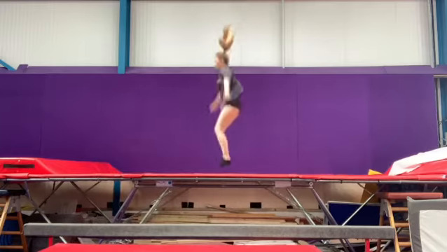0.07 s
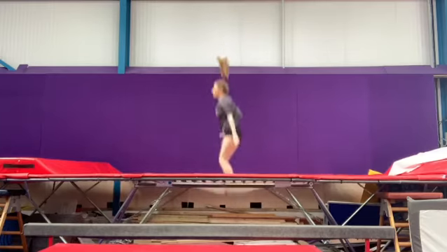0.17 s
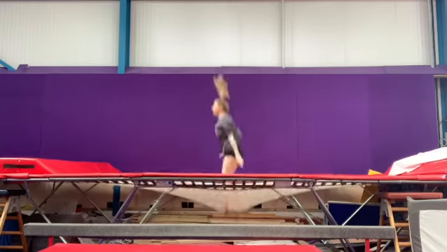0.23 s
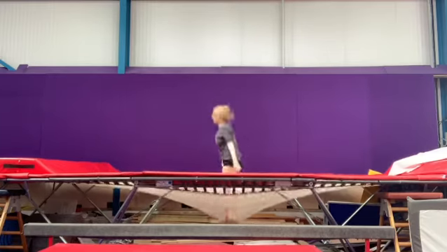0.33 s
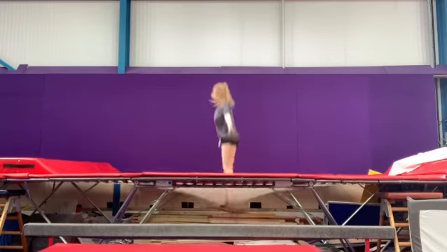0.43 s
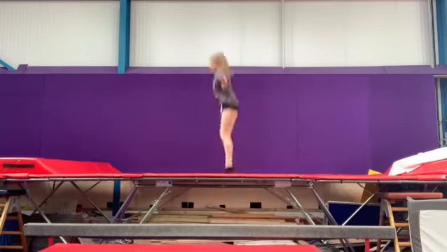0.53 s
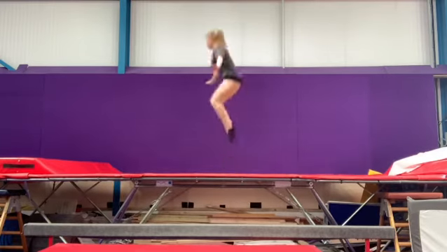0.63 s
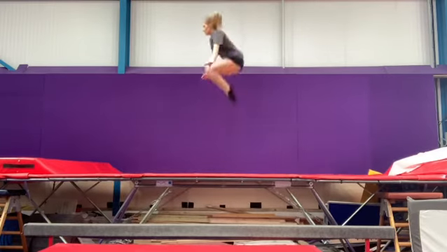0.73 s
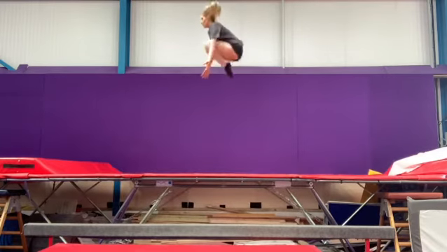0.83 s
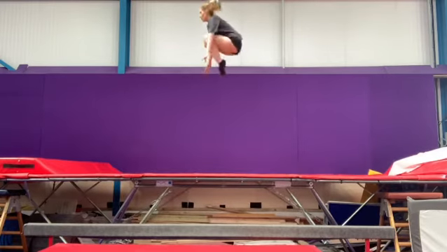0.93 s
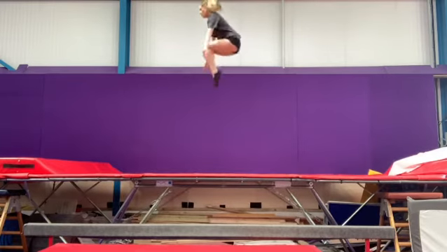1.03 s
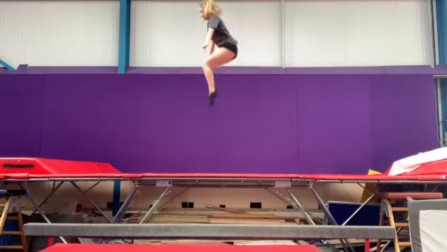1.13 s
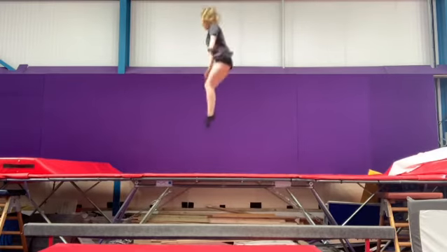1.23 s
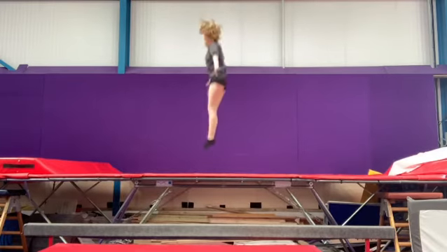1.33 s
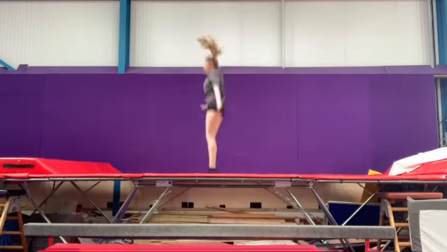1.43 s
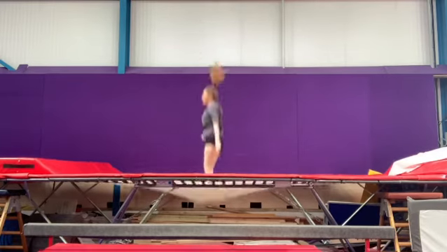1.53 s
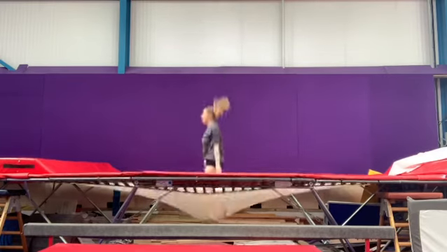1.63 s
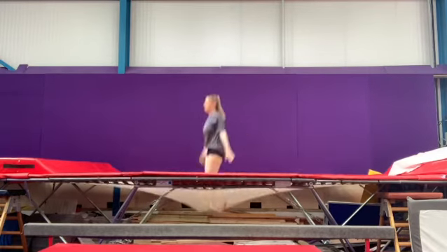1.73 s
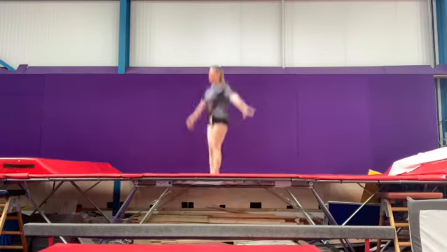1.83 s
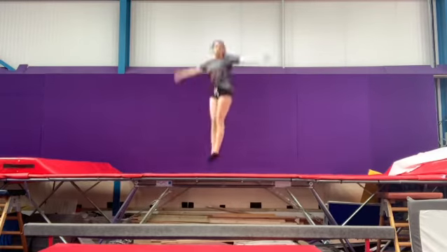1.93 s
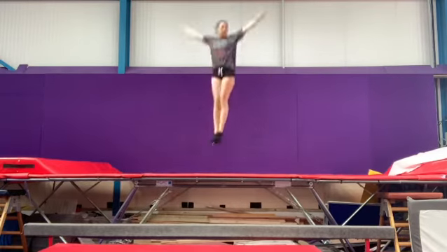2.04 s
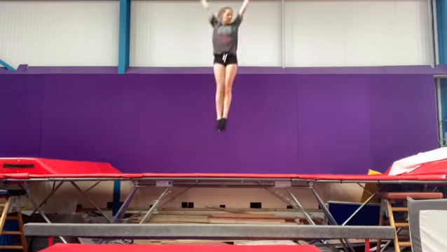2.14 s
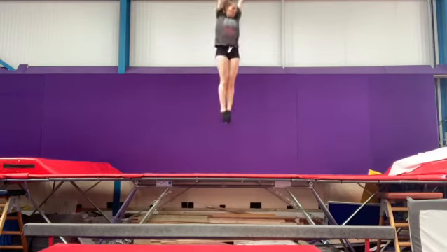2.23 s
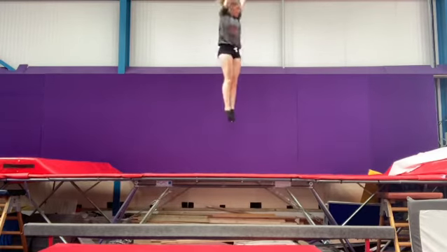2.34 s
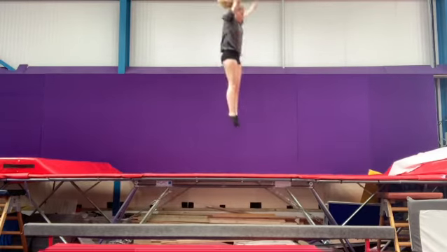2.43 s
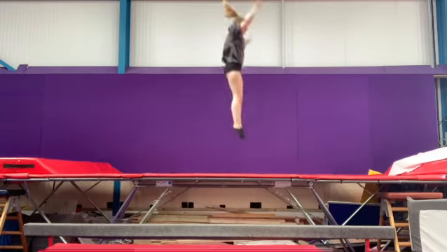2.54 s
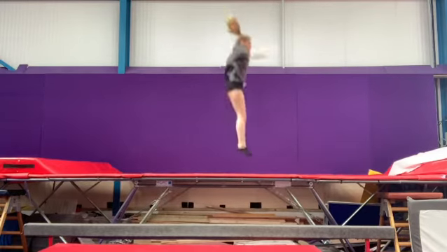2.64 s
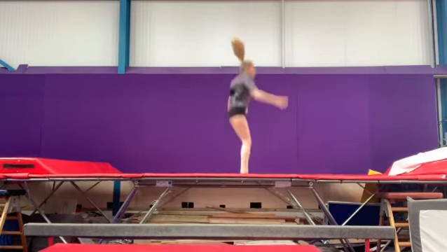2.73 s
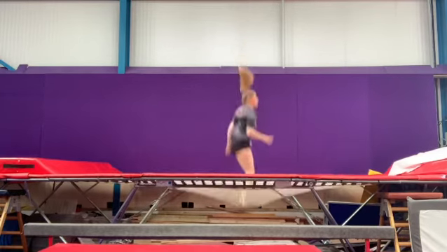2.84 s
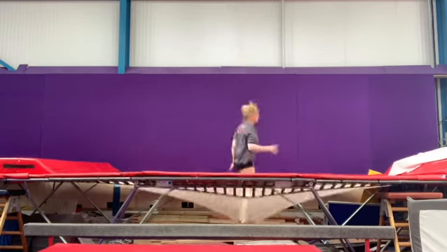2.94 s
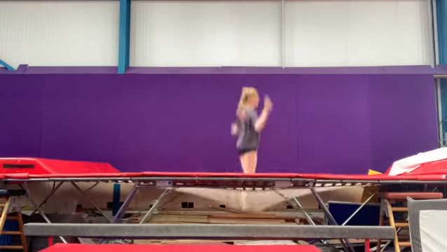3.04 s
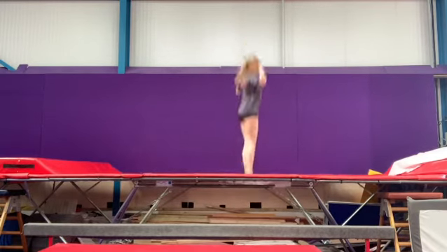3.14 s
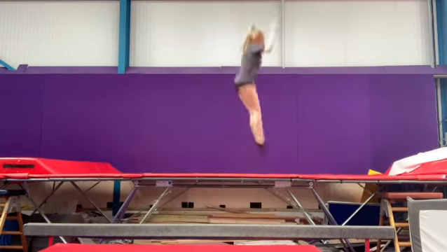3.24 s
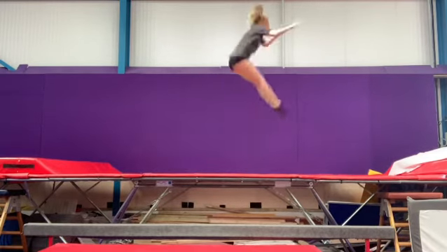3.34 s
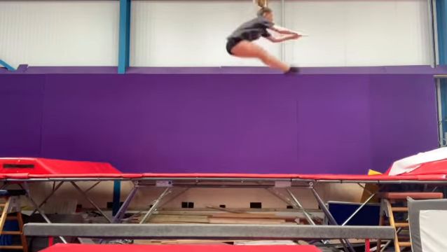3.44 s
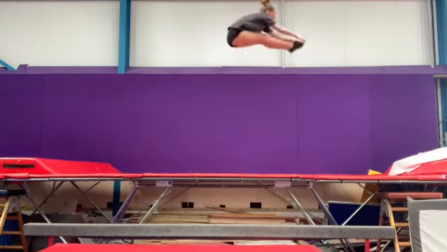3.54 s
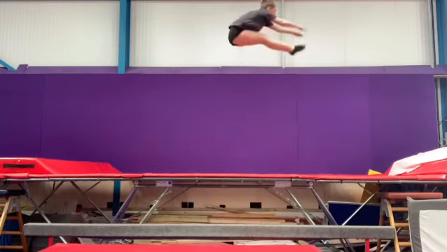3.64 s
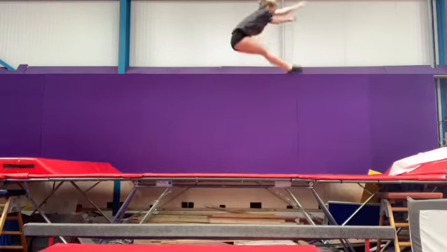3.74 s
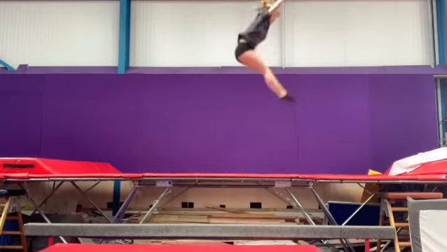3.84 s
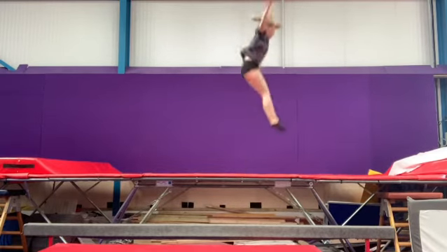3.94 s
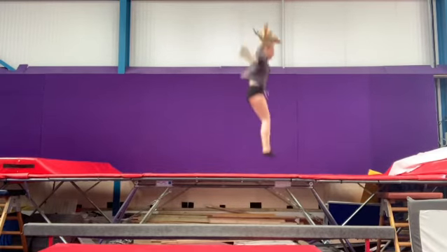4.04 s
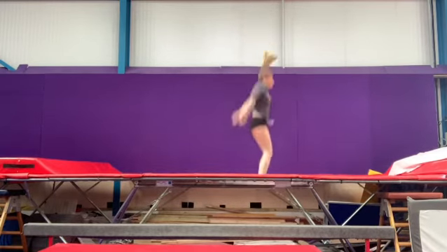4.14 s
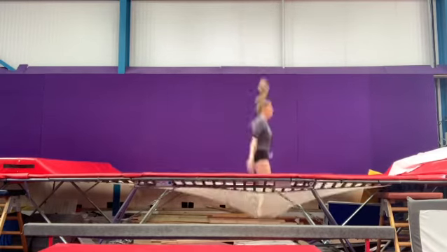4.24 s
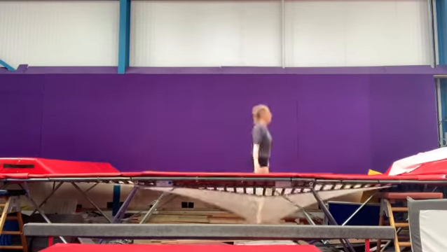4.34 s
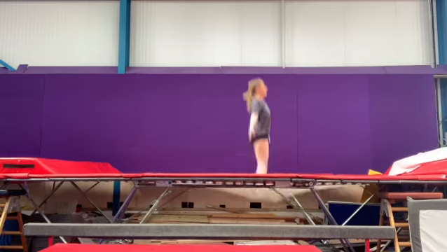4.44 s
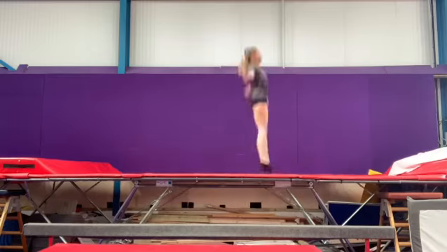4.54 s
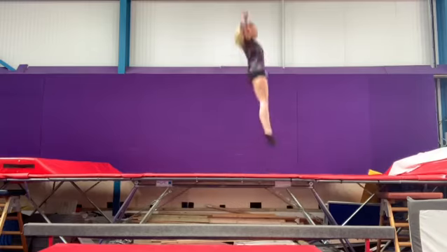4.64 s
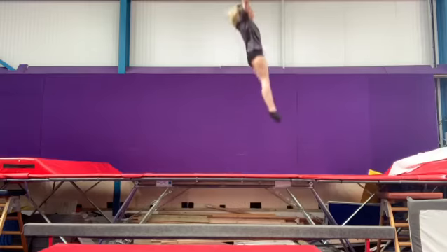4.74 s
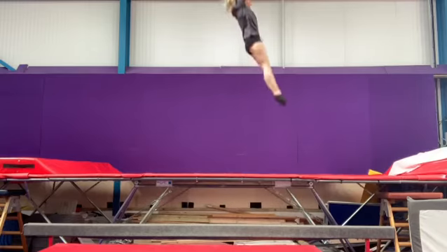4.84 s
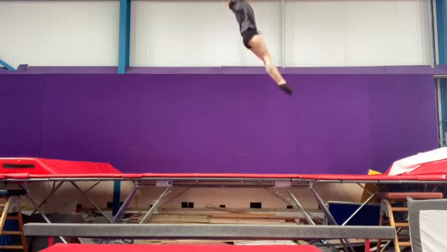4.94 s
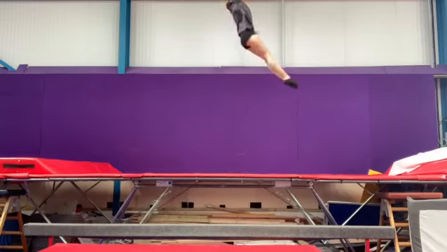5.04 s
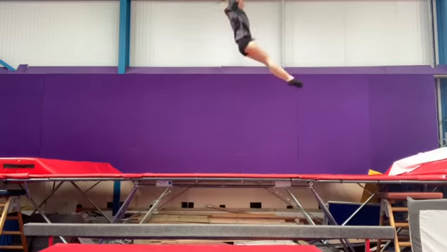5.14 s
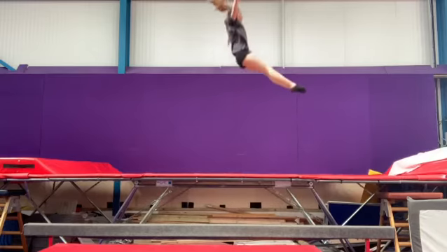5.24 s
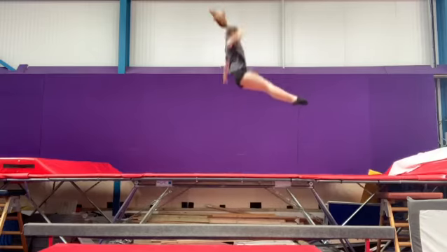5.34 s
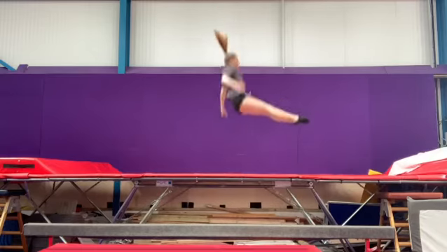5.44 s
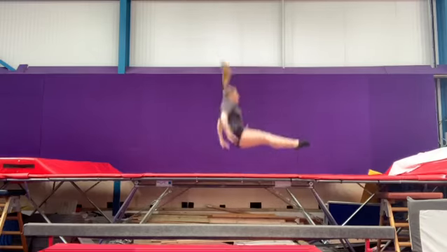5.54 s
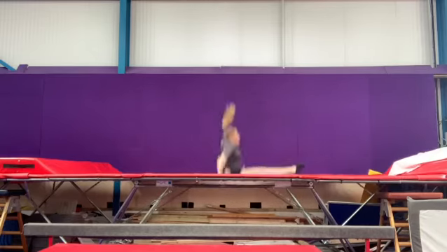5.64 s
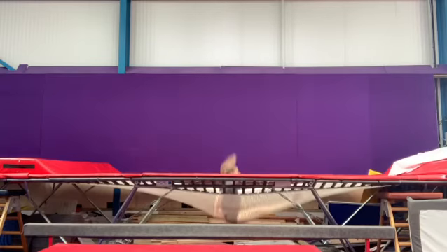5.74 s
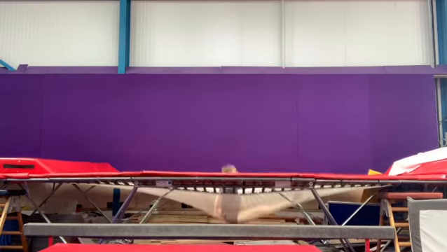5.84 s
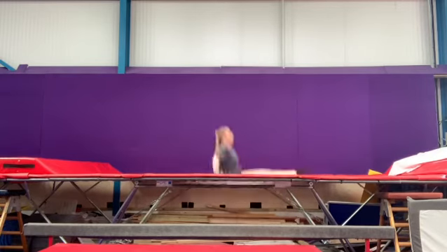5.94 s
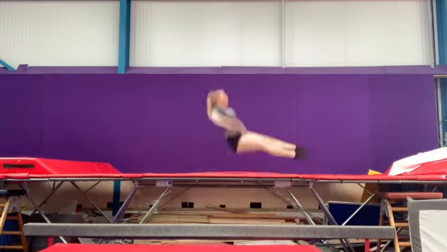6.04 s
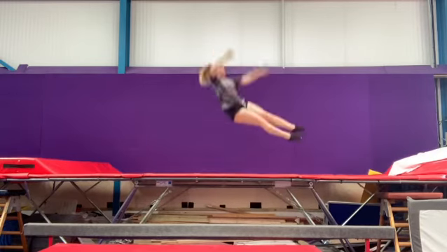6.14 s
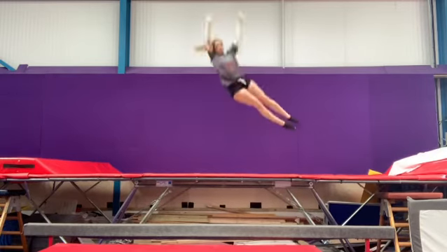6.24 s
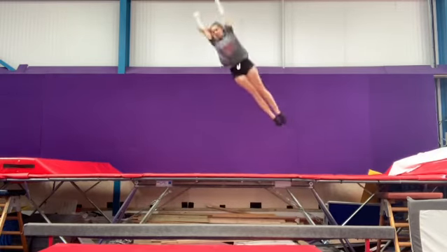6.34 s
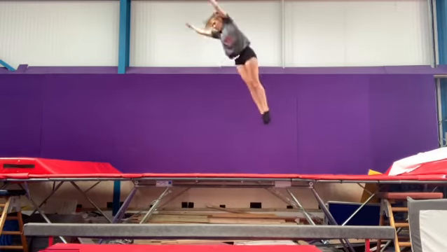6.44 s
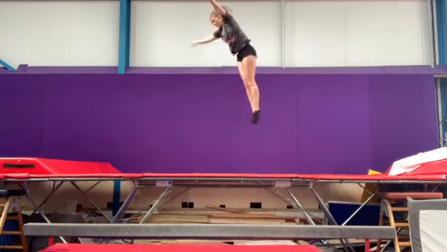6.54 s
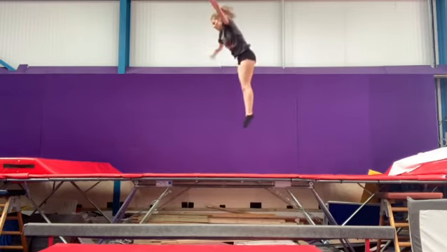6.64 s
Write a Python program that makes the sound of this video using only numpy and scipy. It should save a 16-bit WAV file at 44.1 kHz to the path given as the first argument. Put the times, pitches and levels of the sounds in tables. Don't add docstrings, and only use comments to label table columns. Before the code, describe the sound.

Repeated trampoline bounces: soft creaking, airy thrum under load, sharp coil slam and boom at each take-off, the last ones hardest and clustered.

```python
import sys
import numpy as np
from scipy import signal
from scipy.fft import rfft, irfft, next_fast_len
from scipy.io import wavfile
from scipy.ndimage import uniform_filter1d

SR = 44100
rng = np.random.default_rng(int(sys.argv[2]) if len(sys.argv) > 2 else 0)


def to_wav(sig):
    pcm = np.clip(np.atleast_2d(sig), -1, 1) * 32767
    pcm = np.round(pcm).astype(np.int16)
    wavfile.write(sys.argv[1], SR, pcm.T)


def ratio(d):
    e = np.asarray(d, float) / 20
    return 10 ** e


N = 294568
T = np.arange(N) / SR
SIZE = next_fast_len(N + SR)
HZ = np.maximum(np.arange(SIZE // 2 + 1) * SR / SIZE, 1)

# start [s], end [s].
CONTACTS_S = [
    (.06, .565),
    (1.4, 1.895),
    (2.69, 3.19),
    (4.06, 4.548),
    (5.58, 5.83),
]
# start [s], levels of rattle, clatter and hiss [dB], ring-down [s].
SLAMS = [(0.565, -30.5, -40, -57.5, 0.55), (1.901, -24.5, -41, -55, 0.47), (3.193, -32, -41, -59.5, 0.52),
         (4.551, -26.5, -37.5, -44.5, 0.22), (4.584, -28.5, -38.5, -51, 0.26),
         (5.795, -24, -40.5, -41, 0.25), (5.824, -15.5, -30.5, -41, 0.13), (5.885, -43, -36.5, -47.5, 0.35),
         (6.017, -15.5, -26.5, -16.5, 0.084), (6.058, -18.5, -33, -42, 0.18)]


def unit(x):
    return x / np.sqrt(np.mean(x ** 2))


def gains(table):
    hz, db = np.transpose(table)
    return ratio(np.interp(np.log(HZ), np.log(np.maximum(hz, 1)), db))


def filtered(x, response):
    return irfft(rfft(x, SIZE) * response, SIZE)[..., :N]


def band(lo_hz, hi_hz):
    return 1 / np.sqrt((1 + (lo_hz / HZ) ** 8) * (1 + (HZ / hi_hz) ** 8))


def ring(hz, width_hz):
    return 1j * width_hz * HZ / (hz ** 2 - HZ ** 2 + 1j * width_hz * HZ)


def resonant(modes, mode_db):
    response = 1
    for k, (hz, width_hz, db) in enumerate(modes):
        response = response + (-1) ** k * ratio(db + mode_db) * ring(hz, width_hz)
    return response


def walk(rate_hz):
    hold = int(SR / rate_hz)
    return uniform_filter1d(np.repeat(rng.standard_normal(N // hold + 1), hold), hold)[:N]


def swell(t_s, rise_s, t60_s):
    t_s = np.maximum(t_s, 0)
    return (1 - np.exp(-(t_s / rise_s) ** 2)) * np.exp(-np.log(1000) * t_s / t60_s)


def grit(per_s, scatter_db, smooth):
    happens, sign, size = rng.random((3, N))
    knock_gain = ratio(-scatter_db * np.log(size + 1e-9))
    knocks = (happens < per_s / SR) * np.sign(sign - 0.5) * knock_gain
    return unit(knocks) + smooth * rng.standard_normal(N)


def layers(low, high, exciters, spring_db, frame_db):
    # centre [Hz], width [Hz], level [dB].
    spring_modes = [(644, 13.3, -25), (899, 9.6, 5.5), (2170, 540, -3), (2280, 26, -43), (3380, 130, -33)]
    # centre [Hz], width [Hz], level [dB].
    frame_modes = [(210, 210, -8)]
    # low edge [Hz], high edge [Hz].
    edges_hz = [
        (20, 400),
        (400, 1600),
        (1600, 11500),
        (11000, 15900),
    ]
    springs = resonant(spring_modes, spring_db)
    frame = resonant(frame_modes, frame_db)
    bodies = [gains(low) * frame, gains(low) * springs, gains(high) * springs, 1]
    return [unit(filtered(x, band(*edges) * body)) for x, edges, body in zip(exciters, edges_hz, bodies)]


def mesh_gusts():
    # start [s], hiss level [dB], build-up [s], ring-down [s].
    gust_rows = [(.21, -52.5, 0.017, 0.19), (.31, -61.5, 0.018, 0.47), (.41, -45.5, 0.019, 0.16),
                 (1.57, -52, 0.028, 0.22), (1.708, -63, .004, 0.084), (1.77, -51, 0.0023, 0.081),
                 (2.86, -55, 0.019, .15), (2.979, -56, 0.0064, 0.31), (3.04, -52, 0.011, 0.12),
                 (4.18, -58, 0.043, 1), (4.3, -55, 0.031, 0.28), (4.38, -53, 0.013, 0.096),
                 (5.695, -54.5, 0.012, .6), (5.76, -46.5, 0.038, 0.55), (6.233, -55.5, 0.012, 0.18)]
    return sum(ratio(db) * swell(T - s, rise_s, t60_s) for s, db, rise_s, t60_s in gust_rows)


def loaded_bed():
    # frequency [Hz], level [dB per Hz].
    loaded_spectrum = [(15, -71), (25, 3), (38, -8), (59, 2), (108, -5.5), (331, -15.5), (616, -16),
                       (958, -12.5), (1520, -21), (2220, -15), (3000, -18), (3900, -51), (6600, -120)]
    # frequency [Hz], level [dB per Hz].
    rush_spectrum = [(530, -24), (900, 17), (1430, -8), (3050, -3), (6460, -15.5), (8600, -14.5),
                     (10500, -16.5), (12500, -50), (16200, -61), (22000, -120)]
    # time [s], load [dB].
    loads = [
        [(0.06, -73), (0.102, -51), (0.214, -50.5), (0.288, -53), (0.32, -44.5), (0.34, -50), (0.424, -48),
         (0.555, -56)],
        [(1.4, -66), (1.44, -50.5), (1.45, -52.5), (1.496, -49.5), (1.534, -50), (1.786, -53), (1.884, -52.5),
         (1.89, -50)],
        [(2.69, -81), (2.692, -65), (2.732, -49.5), (2.94, -49), (2.958, -53), (3.016, -52.5), (3.022, -46.5),
         (3.185, -60)],
        [(4.06, -88), (4.07, -62), (4.1, -49), (4.192, -48), (4.21, -45.5), (4.376, -47.5), (4.408, -47.5),
         (4.54, -57)],
        [(5.58, -58), (5.592, -48.5), (5.696, -44), (5.704, -46), (5.75, -48), (5.762, -44), (5.78, -44.5),
         (5.81, -36.5)],
    ]
    # level at reference load [dB], slope [dB per dB of load], extra at full stretch [dB].
    follows = [
        (-48.5, 1.15, 1.5),
        (-55, 1.25, 2.5),
        (-65, 1.19, 6),
        (-86, 1, -2),
    ]
    load_ref_db, deepest = -52, 0.75
    bed_lag_s, gust_rush_db = 0.014, 3

    creak = grit(per_s=2500, scatter_db=0.0, smooth=1.56)
    rush = grit(per_s=7000, scatter_db=1.5, smooth=1.9)
    exciters = [grit(per_s=300, scatter_db=1.0, smooth=0.97), creak, rush, rush]
    parts = layers(loaded_spectrum, rush_spectrum, exciters, spring_db=-8.0, frame_db=-10.5)

    clump = walk(28)
    flutter_db = [3 * walk(24), 2.5 * clump + walk(40), clump + 2 * walk(70), 2 * clump + 2.5 * walk(60)]
    rows = np.concatenate(loads)
    load_db = np.interp(T, rows[:, 0], rows[:, 1]) - load_ref_db
    stretch = sum(np.interp(T, [a, a + deepest * (b - a), b], [0, 1, 0]) for a, b in CONTACTS_S)
    touching = uniform_filter1d(1.0 * (stretch > 0), size=90)
    levels = [touching * ratio(db + slope * load_db + stretch_db * stretch) for db, slope, stretch_db in follows]

    share = 1 / (bed_lag_s * SR)
    levels[0] = signal.lfilter([share], [1, share - 1], levels[0])
    gusts = mesh_gusts()
    levels[2] = levels[2] + ratio(gust_rush_db) * gusts
    levels[3] = levels[3] + gusts
    return sum(part * level * ratio(db) for part, level, db in zip(parts, levels, flutter_db))


def slams():
    # frequency [Hz], level [dB per Hz].
    slam_spectrum = [(15, -18), (25, -34), (49, -2), (158, 0), (218, -3), (277, -3.5), (494, -15.5),
                     (547, -15), (977, -26.5), (1490, -37.5), (3000, -37), (3900, -64.5), (6600, -120)]
    # frequency [Hz], level [dB per Hz].
    clatter_spectrum = [(530, -26), (900, 21.5), (1720, -11), (2200, -12.5), (3890, -15), (6390, -23),
                        (8500, -30.5), (12500, -30.5), (16200, -44), (22000, -120)]
    wobble_hz, wobble = 19.2, 0.63
    clap = grit(per_s=3500, scatter_db=2.0, smooth=0.74)
    exciters = [grit(per_s=400, scatter_db=2.0, smooth=0.68), clap, clap, clap]
    bed, springs, air, mesh = layers(slam_spectrum, clatter_spectrum, exciters, spring_db=-5.5, frame_db=-54)
    out = thuds(bed)
    for s, rattle_db, clatter_db, hiss_db, t60_s in SLAMS:
        rise_s = 0.0079 * (4 * t60_s) ** -0.59
        now = slice(int(s * SR), int(s * SR) + SR)
        t = T[now] - s
        shake = 1 + wobble * np.cos(2 * np.pi * wobble_hz * (t - 0.03))
        rattle = shake * swell(t - 0.003, 3.7 * rise_s, t60_s) + 0.92 * swell(t, rise_s, 0.15)
        clatter = swell(t, 1.13 * rise_s, 0.91 * t60_s) + 0.23 * swell(t, rise_s, 0.36)
        hiss = swell(t, 1.26 * rise_s, 0.24 * t60_s)
        out[now] += ratio(rattle_db - 4.5) * springs[now] * rattle
        out[now] += ratio(clatter_db + 3.5) * air[now] * clatter
        out[now] += ratio(hiss_db + 15.0) * mesh[now] * hiss
    return out


def thuds(bed):
    # start [s], level [dB], pitch [Hz], deep level [dB].
    flaps = [(0.205, -53, 103, -57), (0.315, -36.5, 162, -57), (0.58, -14.5, 188, -11.5),
             (0.604, -16.5, 201, -45), (0.637, -24, 108, -69), (1.742, -49, 105, -36),
             (1.919, -14.5, 126, -12.5), (1.946, -15, 249.4, -30), (1.974, -27, 98, -40),
             (2.981, -36.5, 96, -37), (3.211, -15, 183, -41), (3.24, -19.5, 210, -17.5),
             (3.288, -49, 91.15, -37), (3.318, -31, 121, -59), (4.234, -34, 101, -29.5),
             (4.578, -28.5, 118, -28), (4.598, -22.5, 148, -31), (4.66, -32.5, 90.4, -24.5),
             (4.698, -24, 103, -44), (4.724, -44, 99, -41), (5.611, -35.5, 138, -30.5),
             (5.671, -32.5, 70, -27.5), (5.828, -11.5, 160, -35), (5.85, -14, 203, -34),
             (5.873, -13, 170, -24), (5.92, -33, 145, -16), (6.03, -9, 196, -31), (6.056, -10, 205, -39),
             (6.099, -13, 196, -45), (6.119, -12, 89, -61)]
    t = T[:SR // 2]
    deep = unit(filtered(rng.standard_normal(N), band(51, 99)))
    out = np.zeros(N)
    for s, db, hz, deep_db in flaps:
        t60_s = 0.25 * (hz / 130) ** -0.39
        now = slice(int(s * SR), int(s * SR) + len(t))
        sheet = np.sin(2 * np.pi * hz * t) * swell(t, 0.0013, 0.5 * t60_s)
        frame = 0.41 * bed[now] * swell(t, 0.0023, t60_s)
        out[now] += ratio(db - 1.5) * (sheet + frame)
        out[now] += ratio(deep_db - 1.0) * deep[now] * swell(t, 0.017, 0.93 * t60_s)
    return out


def cracks(table, length_s, sharp, boost_db):
    t = T[:SR // 10]
    bursts = rng.standard_normal((len(table), len(t))) * swell(t, length_s * 0.8, length_s * np.log(1000))
    out = np.zeros(N)
    for (s, db, hz, crack_db), burst in zip(table, bursts):
        peak = signal.iirpeak(hz, sharp, SR)
        part = signal.lfilter(*peak, signal.lfilter(*peak, burst))
        ringing = ratio(db + boost_db) * part / np.max(np.abs(part))
        out[int(s * SR):][:len(t)] += ringing + ratio(crack_db) * burst
    return filtered(out, band(460, 19000))


def spring_twangs():
    # start [s], ring level [dB], pitch [Hz].
    twang_rows = [(0.315, -31.5, 1030), (0.414, -33, 855), (0.574, -32, 1230), (0.592, -20.5, 860),
                  (0.611, -31, 859), (0.644, -28.5, 600), (1.438, -38, 899), (1.749, -34, 950),
                  (1.916, -21.5, 1030), (2.731, -45, 970), (2.901, -37, 1050), (3.017, -32, 1040),
                  (3.199, -23, 1070), (3.22, -20, 790), (3.24, -20, 535), (4.206, -34, 920),
                  (4.232, -31, 1000), (4.303, -50, 856), (4.565, -27, 1030), (4.597, -21, 820),
                  (5.679, -29, 856), (5.732, -34, 1250), (5.762, -25, 900), (5.822, -8, 830),
                  (5.886, -21, 844), (5.953, -34, 880), (6.029, -43, 880), (6.051, -24, 945),
                  (6.073, -17, 714), (6.094, -12.5, 476)]
    crack_db = -62
    return cracks([(*row, crack_db) for row in twang_rows], length_s=0.0051, sharp=2.6, boost_db=-4)


def hook_ticks():
    # start [s], ring level [dB], pitch [Hz], crack level [dB].
    slips = [(0.068, -65, 3500, -76), (0.186, -56, 2080, -61), (0.2473, -44, 3600, -68),
             (0.3103, -47, 2300, -65), (0.574, -48, 2080, -28), (0.5921, -27.5, 1500, -49),
             (1.406, -66, 3500, -61), (1.437, -70, 2190, -68), (1.7152, -49, 2710, -35),
             (1.749, -50, 1740, -59), (1.771, -41.5, 8200, -42), (1.911, -36.5, 2400, -60),
             (2.693, -67, 2200, -61), (2.7257, -56, 1740, -87), (2.982, -45.5, 8600, -50),
             (3.054, -48, 3380, -70), (3.2028, -33.5, 1980, -49), (4.065, -68, 2100, -55),
             (4.399, -36, 8400, -54), (4.565, -52, 2220, -52), (5.578, -44, 2150, -74),
             (5.852, -39, 2010, -30), (5.883, -23.5, 8760, -25), (6.023, -46, 2260, -28),
             (6.2391, -34, 2040, -66.5)]
    return cracks(slips, length_s=0.0036, sharp=1.93, boost_db=2.5)


def hall(direct):
    # octave centre [Hz], ring-down [s].
    decay = [(45, 0.78), (90, 0.85), (180, 0.74), (350, 1.185), (700, 0.89), (1400, 1.117), (2800, 1.194),
             (5600, 0.84), (11000, 0.31)]
    build_s = 0.026
    t, out = T[:SR], np.zeros((2, N + SR))
    starts_s = [row[0] for row in CONTACTS_S] + [row[0] for row in SLAMS]
    cuts = np.sort([0, N] + [int(s * SR) for s in starts_s])
    noise = rfft(rng.standard_normal((len(cuts), 2, SR)))
    pitch, centres = np.log(np.arange(SR // 2 + 1) + 1), np.log(np.array(decay)[:, 0])
    tails = 0
    for k, (hz, t60_s) in enumerate(decay):
        octave = np.interp(pitch, centres, np.arange(len(decay)) == k)
        fade = np.exp(-np.log(1000) * t / t60_s)
        tails = tails + irfft(noise * octave) * fade / np.sqrt(np.sum(fade ** 2))
    tails = tails * (1 - np.exp(-t / build_s))
    for a, b, tail in zip(cuts, cuts[1:], tails):
        out[:, a:b + SR - 1] += signal.fftconvolve(direct[None, a:b], tail, axes=1)
    return out[:, :N]


def hall_air(ports):
    # frequency [Hz], level [dB per Hz].
    air_spectrum = [(15, -34), (25, 13), (76, -2.5), (161, -6.5), (319, -6.5), (465, -11), (647, -9),
                    (3290, -28.5), (3980, -33), (7000, -33.5), (9100, -58), (15400, -120)]
    floor_db = -69.5
    hum = filtered(rng.standard_normal((2, N)), gains(air_spectrum) * ports)
    return hum * ratio(floor_db + 0.3 * walk(6)) / np.std(hum[0])


def scene():
    # frequency [Hz], gain [dB].
    port_gains = [
        [(100, -0.76), (6400, -1.5), (7400, -3), (8100, -7.5), (8700, -13.5), (9900, -10.5), (10700, -1.5),
         (12000, -1)],
        [(30, -33), (80, -14.5), (170, -12.5), (350, -3.5), (700, -2), (1400, -1), (2800, -1), (6500, 0.5),
         (8400, 9), (11500, 3.5), (12700, -6), (13400, -22)],
    ]
    hall_db, direct_side, left_db = -0.5, 0.51, 0.9
    direct = loaded_bed() + slams() + spring_twangs() + hook_ticks()
    ports = np.array([gains(table) for table in port_gains])
    ports = ports / np.sqrt(1 + ratio(hall_db) ** 2)
    heard = filtered(direct, ports * np.array([[1], [-1j * direct_side]]))
    heard = heard + filtered(ratio(hall_db) * hall(direct), ports)
    mid, side = heard + hall_air(ports)
    return np.array([(mid + side) * ratio(left_db / 2), (mid - side) * ratio(-left_db / 2)])


def roll_off(x):
    return signal.sosfilt(signal.butter(12, 16460, fs=SR, output="sos"), x)


def record(dry):
    hiss_db = -96.5
    hiss = ratio(hiss_db) * unit(filtered(rng.standard_normal(N), band(10300, 12000)))
    low_cut = signal.butter(2, 44, "high", fs=SR, output="sos")
    high_cut = signal.ellip(8, 0.2, 60, 15800, fs=SR, output="sos")
    passed = signal.sosfilt(high_cut, signal.sosfilt(low_cut, dry + hiss))
    return roll_off(passed)


dry = scene()
out = record(dry)
to_wav(out)
```